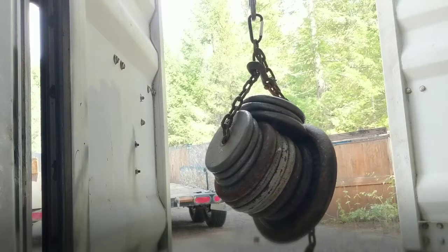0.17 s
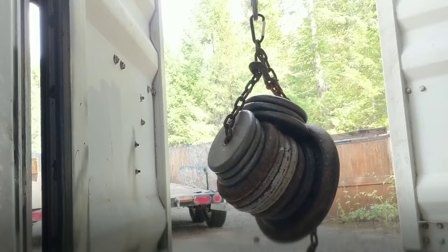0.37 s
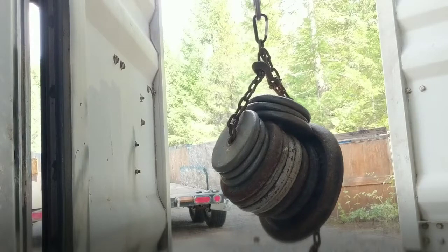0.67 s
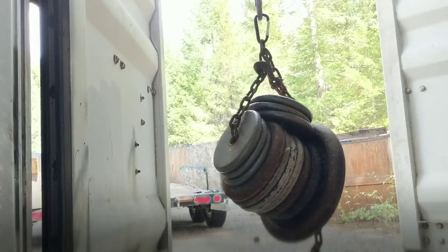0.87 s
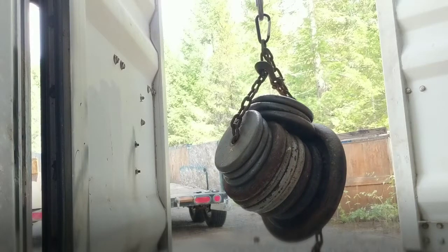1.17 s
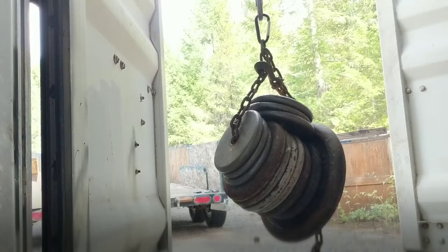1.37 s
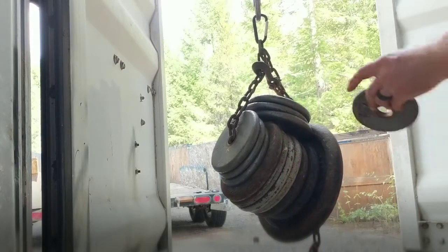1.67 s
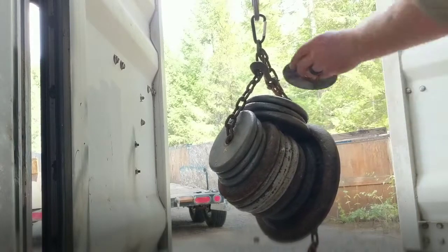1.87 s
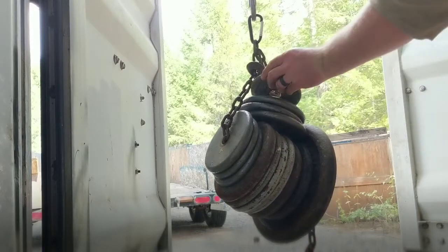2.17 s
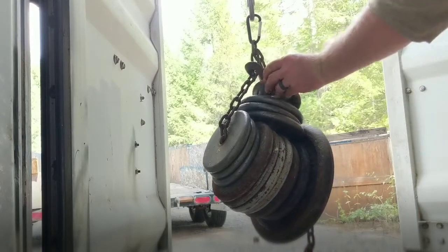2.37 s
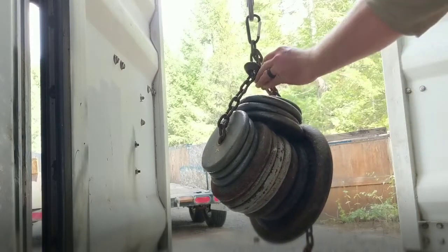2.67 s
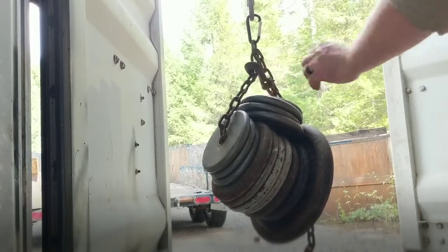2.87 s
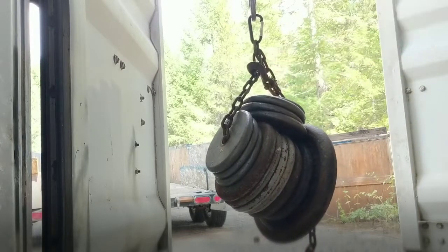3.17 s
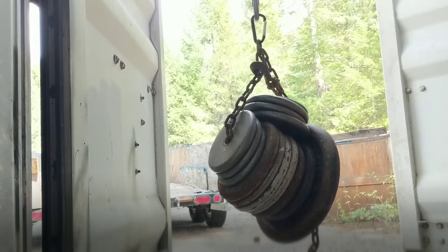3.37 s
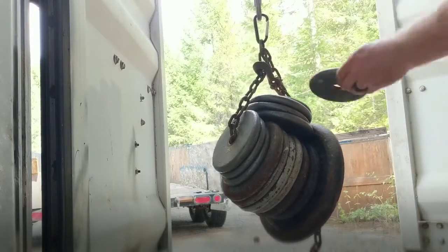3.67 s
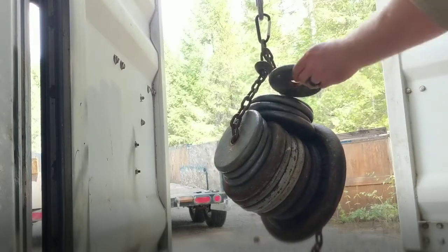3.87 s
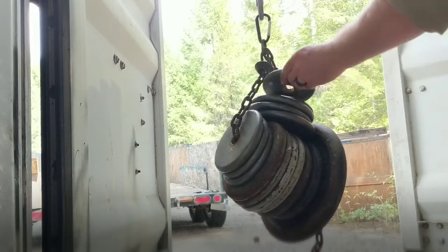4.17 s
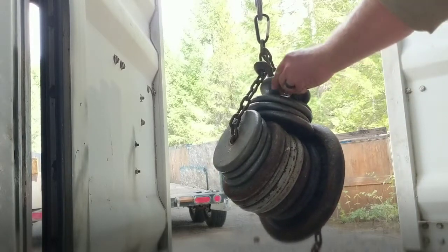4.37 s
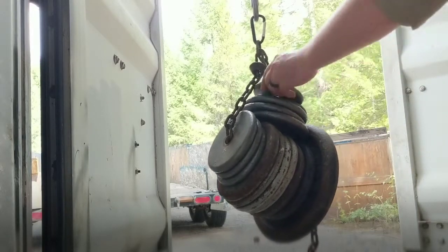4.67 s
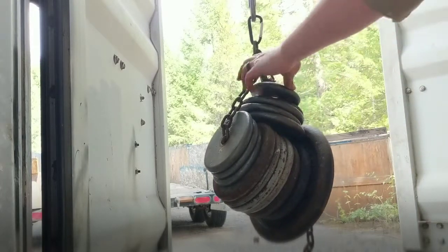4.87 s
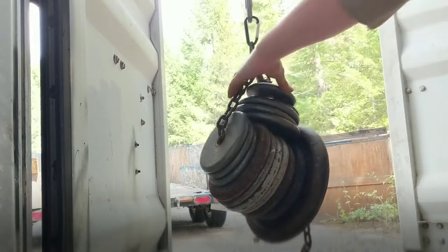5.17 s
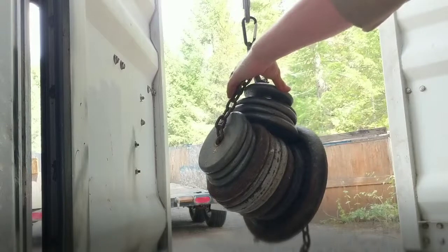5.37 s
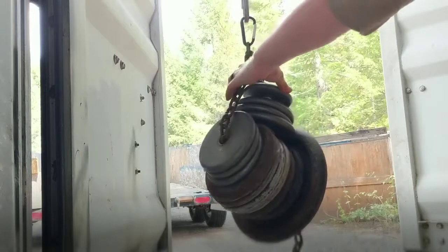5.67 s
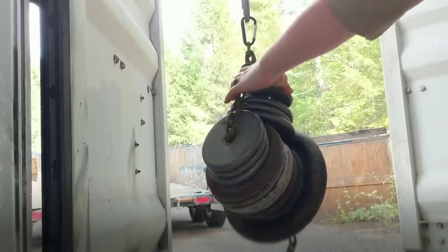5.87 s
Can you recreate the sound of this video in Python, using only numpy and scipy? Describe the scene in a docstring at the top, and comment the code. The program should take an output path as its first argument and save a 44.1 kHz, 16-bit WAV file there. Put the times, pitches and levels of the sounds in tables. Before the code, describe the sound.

Iron plates being stacked in a resonant metal box. A heavy, slightly overloaded clank with a boom opens it, trailed by thuds and gritty scuffs. After a quiet gap come rapid light clinks, then faint scrapes, then one sharp ringing clang with short, damped decay. Muted double knocks and delicate metal rubbing follow, fading into faint rumble, hum and hiss with short wall echoes.

```python
"""Iron weight plates clank in the open end of a steel container, near a small microphone.
Blows, light touches and rubbing wake the modes of a small hand-held plate and a hanging stack.
Steps and shifting weight are decaying low pushes and random slips through floor and wall resonances.
Shoes and sleeves scuff as short noise and a wall panel hums on as one wavering mode over rumble.
The box answers with wall echoes and a decaying random tail."""
import sys
import numpy as np
from scipy import signal
from scipy.fft import rfft, irfft
from scipy.io import wavfile
from scipy.ndimage import uniform_filter1d

SR = 44100
rng = np.random.default_rng(int(sys.argv[2]) if len(sys.argv) > 2 else 0)


def unload_audio(sound):
    """Save the sound as a 16-bit wav file, at the path given as the first command line argument."""
    columns = np.transpose(np.atleast_2d(sound))
    # keep every value between -1 and 1, then stretch to whole-number steps
    steps = np.round(np.clip(columns, -1, 1) * 32767)
    wavfile.write(sys.argv[1], SR, steps.astype(np.int16))


N = 265041

# Small plate, modes in close pairs: frequency in Hz.
SMALL_PLATE_HZ = [3418, 3467, 5426, 5652, 7890, 8070, 8269, 11140, 13670]
# Small plate, one row per mode above: level in dB, t60 in s before damping.
SMALL_PLATE_MODES = [(0.5, 0.091), (-5, 0.31), (-25.5, 0.3), (-6, 0.093), (-10, .06), (-18, 0.35),
                     (-25, 0.4), (-33.5, .1), (-33.5, .08)]
# Hanging stack: mode frequency in Hz.
STACK_MODE_HZ = [860, 1235, 1330, 1925, 2310, 2485, 2650, 2770, 2860, 3165, 3278, 3404, 3930, 4334, 4390,
                 5722, 6298, 6335, 8969, 9631, 10570]
# Hanging stack, one row per mode above: level in dB, t60 in s before damping.
STACK_MODES = [(-16, 0.033), (-29, 0.34), (-18, .15), (-11, 0.11), (-13, 0.061), (-8.5, 0.12), (-9, 0.083),
               (2, 0.069), (-7.5, 0.11), (-14, 0.095), (-17, 0.2), (-6.5, 0.23), (-9, .15), (-11, 0.051),
               (-9.5, .13), (-18, 0.14), (-14.5, 0.19), (-8.5, 0.098), (-17, 0.12), (-19.5, 0.071),
               (-15.5, 0.14)]


def amp(db):
    """Decibels to gain."""
    return 10 ** (np.asarray(db) / 20)


def evened(x):
    """Scales to rms 1."""
    return x / np.sqrt(np.mean(x ** 2) + 1e-20)


def read(points, hz):
    """Joins (Hz, value) points on a log-frequency axis."""
    point_hz, value = np.transpose(points)
    return np.interp(np.log(hz + 1), np.log(point_hz + 1), value)


def curves(rows):
    """Joins rows headed by a time in seconds into one curve a column."""
    s, *columns = np.transpose(rows)
    return [np.interp(np.arange(N) / SR, s, column) for column in columns]


def add(mix, s, sound):
    """Mixes a sound in at time s, cut at the end of the mix."""
    part = mix[max(round(s * SR), 0):][:len(sound)]
    part += sound[:len(part)]


def resonate(x, hz, width_hz):
    """A fixed resonance of peak gain 1, its Q at least 0.2."""
    q = max(hz / width_hz, .2)
    b, a = signal.iirpeak(np.clip(hz, 20, SR / 2.2), q, SR)
    return signal.lfilter(b, a, x)


def coloured(x, points):
    """Shapes the spectrum by (Hz, dB) points."""
    hz = np.fft.rfftfreq(len(x), 1 / SR)
    return irfft(rfft(x) * amp(read(points, hz)), len(x))


def swells(rows, column, *falls):
    """Gain of overlapping efforts: each rises, holds, then dies in parts of (dB, fall dB per s)."""
    t, power = np.arange(N) / SR, np.zeros(N)
    whole = sum(amp(part_db) for part_db, _ in falls)
    for row in rows:
        start, rise, hold = row[:3]
        after = np.maximum(t - start - rise - hold, 0)
        dying = sum(amp(part_db - fall * after) for part_db, fall in falls) / whole
        rising = np.clip((t - start) / rise, 0, 1)
        power += (amp(row[column]) * rising * dying) ** 2
    return np.sqrt(power)


def plates():
    """Each blow is a knock that sets the plates ringing; light touches wake one mode and brush the small plate."""
    # Each row: start in s, knock peak in dB, small plate level in dB, stack level in dB, knock centre in Hz,
    # width of the first knock resonance in Hz, hardness as ring tilt in dB per octave.
    blows = [(0.3858, -3.5, 0.5, -45, 2356, 910.4, -6.5), (.3865, -1.5, -35, -49, 5340, 3000, -6.5),
             (.629, -23, -32, -46, 2160, 1770, -16), (0.7044, -28.5, -40, -42.5, 2020, 2190, -9),
             (1.553, -41, -65.5, -62, 2130, 700, -9), (1.5612, -20, -26.5, -42, 2320, 810, -3.5),
             (1.6029, -23, -77, -49, 4550, 900, -15.5), (1.6041, -17, -28.5, -50, 2400, 750, -3.5),
             (1.617, -30, -21, -60, 2300, 900, -12), (2.252, -38.5, -48, -61, 2460, 2500, -20.5),
             (2.284, -40.5, -50, -50, 3018, 2500, -15.5), (2.597, -40, -55.5, -51.5, 2000, 2480, -13),
             (2.687, -38, -58.5, -48, 2900, 1500, -10), (2.7873, 3, -11, -4, 2766, 2800, 2.5),
             (2.845, -32.5, -15, -14.5, 2980, 2500, -0.5), (3.9854, -23.5, -34, -41.5, 1788, 1600, -15),
             (4.076, -19, -35, -36, 1770, 1680, -9), (4.4533, -31.5, -47, -53, 3130, 1010, -14)]
    # Touches of chain and iron. Each row: start in s, ping level in dB, small plate level in dB,
    # ping mode in Hz, its width in Hz.
    touches = [(.58, -38.5, -70, 5446, 9), (2.307, -50, -73.5, 7900, 12), (2.348, -51.5, -60, 4394, 8.1),
               (2.5, -57, -79, 2760, 8.6), (2.55, -53, -74, 2800, 19), (3.0, -38.5, -70, 6400, 13),
               (4.109, -51, -61.5, 4420, 21), (4.29, -58, -76, 5680, 10), (4.37, -58, -80, 5680, 8),
               (4.463, -44.5, -75, 2440, 25), (4.551, -46, -65.5, 2470, 27), (4.565, -65, -80, 5480, 12),
               (4.574, -40.5, -48.5, 3373, 40), (5.7188, -57, -62.5, 3420, 30.6)]
    damping = 0.68  # hand and neighbours shorten t60 by this factor
    touch_tilt_db = 6.5  # per octave
    knocks, rings = np.zeros(N), np.zeros(N)
    for s, knock_db, small_db, stack_db, hz, width_hz, tilt_db in blows:
        chance = rng.standard_normal(len(STACK_MODES))
        noise = rng.standard_normal(SR // 4)
        small = ring(SMALL_PLATE_HZ, SMALL_PLATE_MODES, damping, tilt_db, chance)
        stack = ring(STACK_MODE_HZ, STACK_MODES, damping, tilt_db, chance)
        add(knocks, s, amp(knock_db) * knock(hz, width_hz, noise))
        add(rings, s, amp(small_db) * small)
        add(rings, s, amp(stack_db) * (stack + crash(hz, noise[::-1])))
    for s, ping_db, small_db, hz, width_hz in touches:
        chance = rng.standard_normal(len(SMALL_PLATE_MODES))
        noise = rng.standard_normal(SR // 4)
        small = ring(SMALL_PLATE_HZ, SMALL_PLATE_MODES, damping, touch_tilt_db, chance)
        add(knocks, s, amp(ping_db) * ping(hz, width_hz, noise))
        add(rings, s, amp(small_db) * small)
    return knocks, rings


def knock(hz, width_hz, noise):
    """One contact and a little grit through three resonances: broad is dull, narrow pings."""
    t = np.arange(len(noise)) / SR
    push = (t == 0) + 0.035 * noise * amp(-60 * t / 0.039)
    # the contact has a length, so the top is soft
    b, a = signal.butter(2, min(hz + 0.29 * width_hz, 15000), fs=SR)
    out = signal.lfilter(b, a, push)
    for spread in (1, 1.8, 2.8):
        out = resonate(out, hz, spread * width_hz)
    return out / abs(out).max()


def ring(hz, modes, damping, tilt_db, chance):
    """Dying modes, neighbours of opposite sign; where the blow lands changes the share of each."""
    hz = np.array(hz)[:, None]
    db, t60_s = np.transpose(modes)[:, :, None]
    t = np.arange(SR // 4) / SR
    sign = (-1.) ** np.arange(len(modes))[:, None]
    db = db + tilt_db * np.log2(hz / 3000) + 1.2 * chance[:len(modes), None]
    level = sign * amp(db - 60 * t / (t60_s * damping))
    onset = 1 - np.exp(-t / 0.00078)
    return (level * np.sin(2 * np.pi * hz * t)).sum(0) * onset


def crash(hz, noise):
    """The many plates of the stack add modes too crowded to tell apart: a rough, dying hiss."""
    level_db, t60_s = -9.5, .13
    t = np.arange(len(noise)) / SR
    crowd = evened(resonate(resonate(noise, hz, 3.9 * hz), hz, 1.6 * hz))
    return amp(level_db - 60 * t / t60_s) * crowd * (1 - np.exp(-t / .002))


def ping(hz, width_hz, noise):
    """One mode, woken quickly; uneven contact adds narrow noise, so it flutters as it dies."""
    roughness = .4  # rms of the noise beside a sine of peak 1
    t = np.arange(len(noise)) / SR
    scrape = evened(resonate(resonate(noise, hz, 70), hz, 70))
    tone = np.sin(2 * np.pi * hz * t) + roughness * scrape
    return tone * np.exp(-np.pi * width_hz * t) * (1 - np.exp(-t / .004))


def rubbing():
    """Grit between sliding plates taps their modes many times, faintly; rubbing favours the high ones."""
    # Plates sliding in the hand and on each other. Each row: start in s, rise in s, hold in s,
    # small plate level in dB, stack level in dB.
    rubs = [(.55, 0.019, 0.042, -52, -78), (.76, 0.031, 0.16, -65, -68), (1.45, 0.095, .01, -57.5, -65),
            (2.29, .03, .08, -61, -71), (2.45, 0.13, .22, -64.5, -61.5), (4.12, 0.029, .13, -73, -74.5),
            (4.28, 0.043, .24, -64.5, -66.5)]
    fall_db_per_s, taps_per_s = 151, 160
    damping, tilt_db = 0.3, 4.5  # t60 factor, dB per octave
    out = np.zeros(N)
    bodies = ((SMALL_PLATE_HZ, SMALL_PLATE_MODES), (STACK_MODE_HZ, STACK_MODES))
    for column, (hz, modes) in enumerate(bodies, start=3):
        size = amp(3.0 * np.minimum(rng.exponential(1, N), 4))
        sign = rng.choice([-1, 1], N)
        grit = size * sign * (rng.random(N) < taps_per_s / SR)
        body = ring(hz, modes, damping, tilt_db, np.zeros(30))
        shimmer = evened(signal.oaconvolve(grit, body)[:N])
        out += shimmer * swells(rubs, column, (0, fall_db_per_s))
    return out


def thumps():
    """Dull thumps: a push of about one cycle, felt through the floor."""
    # Each row: start in s, level in dB before decay, centre in Hz.
    thump_rows = [(0.035, -37, 156), (0.3862, -1, 398), (.389, -10, 145.4), (0.543, -9, 170),
                  (0.641, -14.5, 213), (0.686, -12, 135), (0.709, -16, 302), (.86, -29, 548),
                  (2.254, -29, 600), (2.599, -31.5, 700), (2.788, -11.5, 792), (3.986, -40, 222),
                  (4.076, -47.5, 818), (4.441, -25, 501)]
    out = np.zeros(N)
    for s, db, hz in thump_rows:
        turns = np.arange(round(4 * SR / hz)) * hz / SR
        add(out, s, amp(db) * np.sin(2 * np.pi * turns) * np.exp(-1.2 * turns))
    return out


def scuffs():
    """Shoes and sleeves: brief brushes of gritty noise around 7.8 kHz."""
    # Each row: start in s, noise rms in dB before the envelope, length in s (at least 2 ms is used).
    scuff_rows = [(0.003, -51, 0.07), (0.157, -48.5, 0.009), (0.25, -51.5, 0.015), (0.567, -32.5, 0.014),
                  (0.628, -61.5, .011), (0.685, -45, 0.019), (0.7133, -23.5, 0.0013), (0.852, -41.5, 0.004),
                  (0.861, -40, 0.0094), (1.36, -50, 0.015), (1.446, -49.5, 0.026), (2.2523, -47.5, 0.0082),
                  (3.261, -55.5, 0.011), (3.427, -55.5, 0.019)]
    out = np.zeros(N)
    noises = rng.standard_normal((len(scuff_rows), SR // 4))
    for (s, db, length_s), noise in zip(scuff_rows, noises):
        u = np.arange(SR // 4) / SR / max(length_s, .002)
        brush = evened(resonate(noise, 7800, 4800))
        add(out, s, amp(db) * brush * np.minimum(8 * u, 1) * np.exp(-2 * u))
    return out


def shaking():
    """Uneven small slips of the floor excite the low boom, the large wall sheets and the wall rattle."""
    # Shifts of weight. Each row: start in s, rise in s, hold in s, deep boom level in dB,
    # large wall sheets level in dB, wall rattle level in dB.
    shakes = [(.0, 0.02, 0.011, -39.5, -50, -81), (.386, 0.002, 0.012, -24, -27.5, -23.5),
              (.54, 0.0066, 0.012, -27, -31.5, -29.5), (.61, 0.023, 0.065, -27, -37, -38.5),
              (2.253, 0.0088, 0.12, -52.5, -39.5, -37.5), (2.42, 0.049, 0.085, -46.5, -45.5, -53.5),
              (2.597, 0.0057, 0.3, -49, -46, -41.5), (2.66, 0.04, 0.086, -41.5, -43.5, -57),
              (2.96, 0.058, 0.045, -42, -44, -51), (3.2, 0.032, 0.072, -53, -49, -78),
              (3.99, 0.012, 0.15, -49.5, -43, -48.5), (4.338, 0.0082, 0.13, -58, -41, -41),
              (4.44, 0.039, 0.12, -50, -40, -39), (4.62, 0.046, 0.13, -46, -52, -56)]
    # Resonances of each body. Each row: centre in Hz, nominal width in Hz, relative level in dB.
    boom = [(64.24, 10, -4.5), (136.4, 30, 3.5), (161, 13, -7)]
    sheets = [(222, 65, 6.5), (309, 66, -5.5)]
    walls = [(495, 94, 0), (600, 62, -5), (755, 230, -3.5), (1040, 400, -13), (1600, 1100, -22.5)]
    # Decay of each body: first fall in dB per s, lingering part in dB, its fall in dB per s.
    boom_fade = (100, -12.5, 31)
    sheets_fade = (190, -16, 24)
    walls_fade = (190, -24, 28)
    slips_per_s = 1200
    out = np.zeros(N)
    bodies = ((3, boom, boom_fade), (4, sheets, sheets_fade), (5, walls, walls_fade))
    for column, body, (fall, linger_db, slow_fall) in bodies:
        size = amp(2.5 * np.minimum(rng.exponential(1, N), 4))
        sign = rng.choice([-1, 1], N)
        slips = size * sign * (rng.random(N) < slips_per_s / SR)
        tone = np.zeros(N)
        for hz, width_hz, db in body:
            mode = resonate(resonate(slips, hz, 0.97 * width_hz), hz, 0.97 * width_hz)
            tone += amp(db) / np.sqrt(width_hz) * mode
        # even out the level over 1/16 s: the push of the foot sets it
        steady = tone / np.sqrt(uniform_filter1d(tone ** 2, SR // 16) + 1e-12)
        out += swells(shakes, column, (0, fall), (linger_db, slow_fall)) * steady
    return out


def panel():
    """A wall panel hums: one low mode that wavers a little, over loose rumble."""
    # Each row: time in s, mode in Hz, mode rms in dB, rumble rms in dB.
    panel_rows = [(0.0, 78, -45, -58), (0.18, 83.7, -83, -91), (0.48, 76.7, -44, -35),
                  (1.5, 81.77, -41, -54), (2.94, 80.96, -50.5, -49), (6.01, 77.6, -55, -56)]
    hz, tone_db, rumble_db = curves(panel_rows)
    rumble = resonate(resonate(rng.standard_normal(N), 60, 35), 60, 35)
    tone = np.sqrt(2) * np.sin(2 * np.pi * np.cumsum(hz) / SR)
    return amp(tone_db) * tone + amp(rumble_db) * evened(rumble)


def box(x):
    """A few wall echoes, then sparse taps of random sign, each band dying at its own speed."""
    # Each row: frequency in Hz, t60 in s.
    band_t60 = [(200, 0.71), (1000, 0.53), (3000, 0.42), (8000, 0.27), (14000, 0.12)]
    # Nearest walls. Each row: delay in s, level in dB.
    echoes = [(.0045, -2.5), (.012, -4.5), (.019, -16), (.025, -11.5)]
    taps = np.zeros(SR)
    at = np.arange(300, SR - 20, 20)
    taps[at + rng.integers(0, 20, len(at))] = rng.choice([-1., 1.], len(at))
    hz, t, z = signal.stft(taps, SR, nperseg=256)
    decay = amp(-60 * t / read(band_t60, hz)[:, None])
    tail = signal.istft(z * decay, SR, nperseg=256)[1]
    tail *= amp(-2.0) / np.linalg.norm(tail)
    for s, db in echoes:
        tail[round(s * SR)] += amp(db)
    return signal.fftconvolve(x, tail)[:N]


def scene():
    """Direct sound, the box's answer, and what the floor and walls give off themselves."""
    knocks, rings = plates()
    low = thumps()
    soft = scuffs() + rubbing()
    direct = knocks + rings + low + soft
    answer = box(0.63 * rings + 0.35 * knocks + 0.4 * low + 0.4 * soft)
    return (direct + answer + shaking() + panel())[None]


def record(dry):
    """A microphone with little deep bass and dull treble, its steady hiss, full-scale overload, a band limit."""
    # Microphone response. Each row: frequency in Hz, gain in dB.
    mic = [(6000, -1.5), (8200, 1), (9000, -14.5), (12000, -17.5), (16000, -26)]
    # Hiss spectrum. Each row: frequency in Hz, relative density in dB per Hz.
    hiss_colour = [(53, -29.5), (90, -6), (122, -13.5), (172, -2.5), (204, -14), (342, -18.5), (757, -22),
                   (2170, -27), (6230, -31.5), (9380, -37.5), (15400, -40.5)]
    hiss_rms_db, bass_cut_hz, edge_hz = -57, 52, 15560
    grid = np.linspace(0, 1, 257)
    # doubled dB: minimum_phase takes the square root of the magnitude
    gain = amp(2 * read(mic, grid * SR / 2))
    colour = signal.minimum_phase(signal.firwin2(511, grid, gain))
    hiss = amp(hiss_rms_db) * evened(coloured(rng.standard_normal(N), hiss_colour))
    bass_cut = signal.butter(3, bass_cut_hz, "high", fs=SR, output="sos")
    thinned = signal.sosfilt(bass_cut, dry)
    heard = signal.oaconvolve(thinned, colour[None])[:, :N] + hiss
    heard = np.clip(heard, -1, 1)
    band_limit = signal.firwin(511, edge_hz, window=("kaiser", 9), fs=SR)
    return signal.oaconvolve(heard, band_limit[None], "same")


dry = scene()
out = record(dry)
unload_audio(out)
```